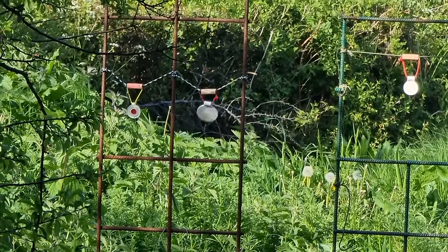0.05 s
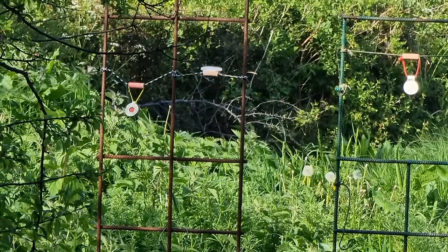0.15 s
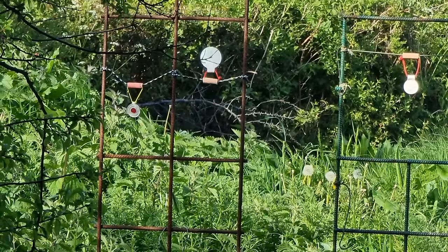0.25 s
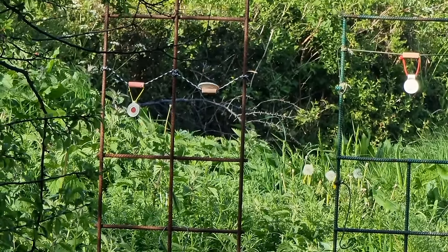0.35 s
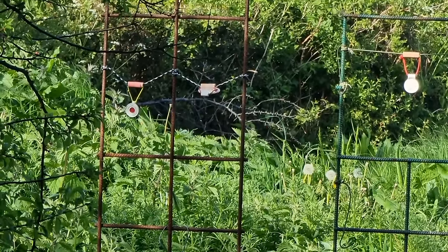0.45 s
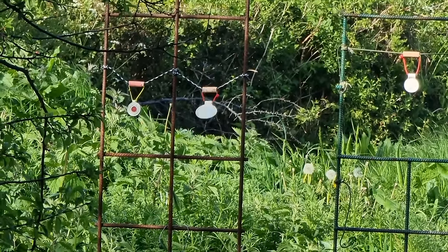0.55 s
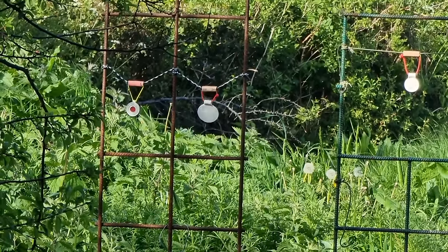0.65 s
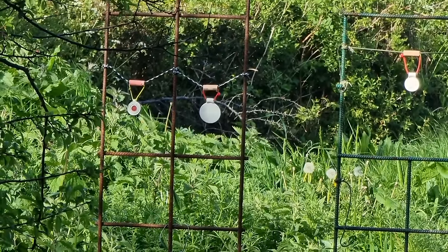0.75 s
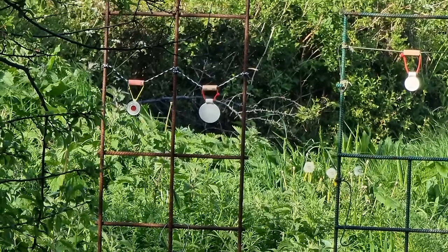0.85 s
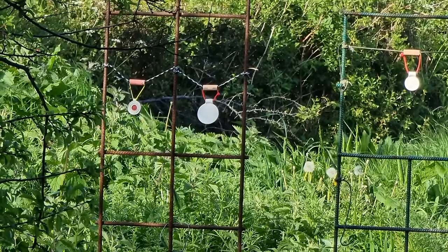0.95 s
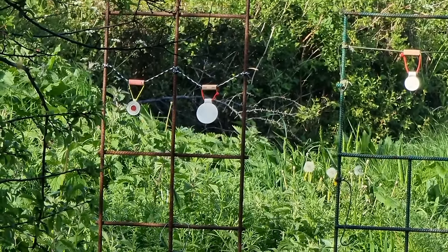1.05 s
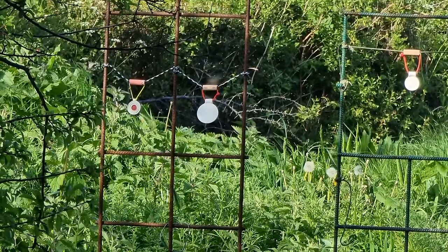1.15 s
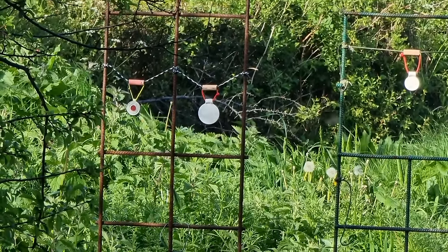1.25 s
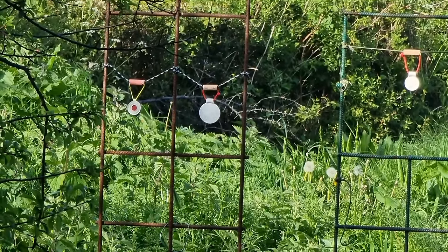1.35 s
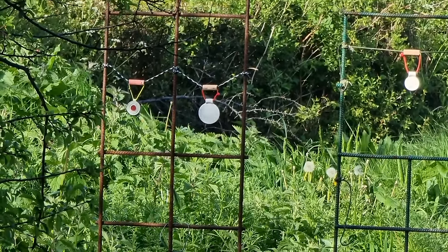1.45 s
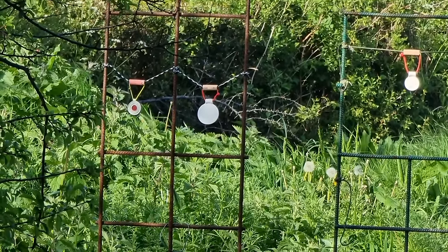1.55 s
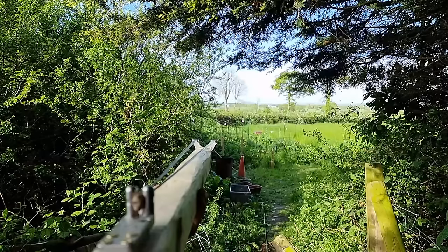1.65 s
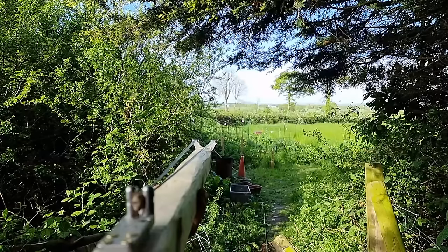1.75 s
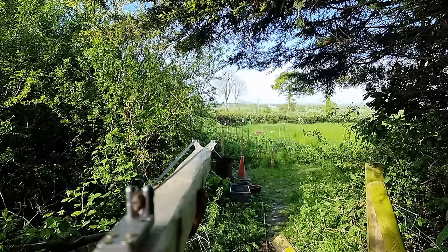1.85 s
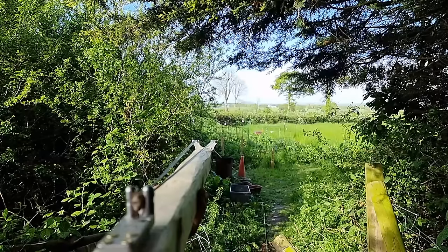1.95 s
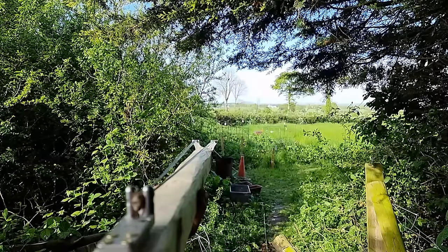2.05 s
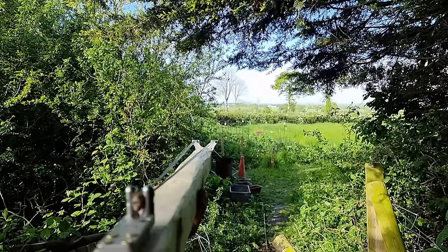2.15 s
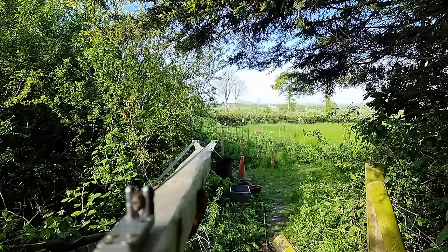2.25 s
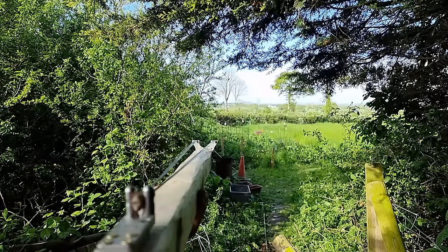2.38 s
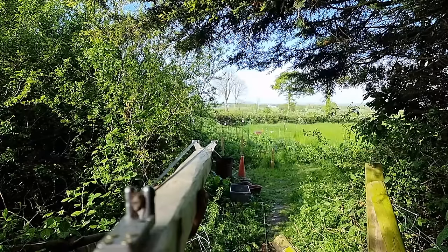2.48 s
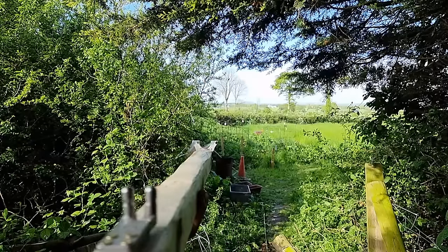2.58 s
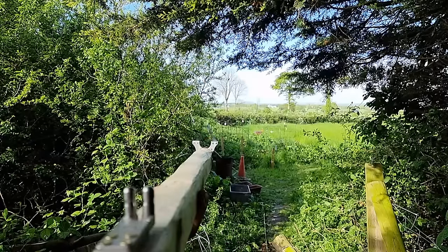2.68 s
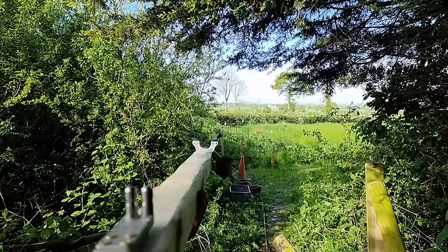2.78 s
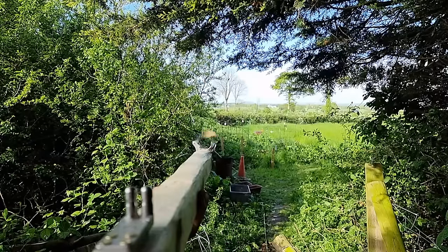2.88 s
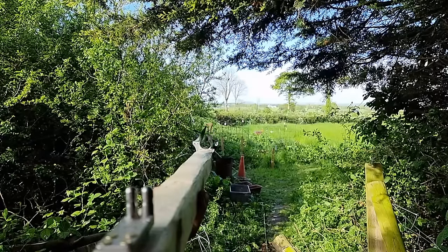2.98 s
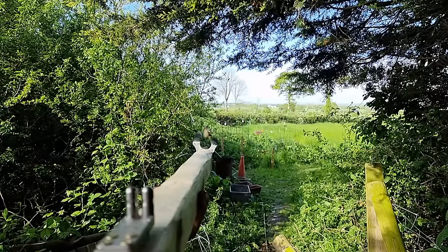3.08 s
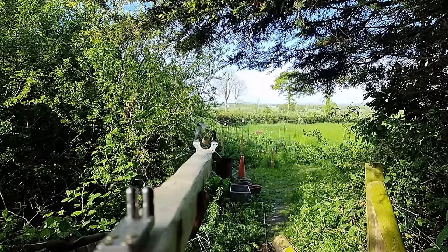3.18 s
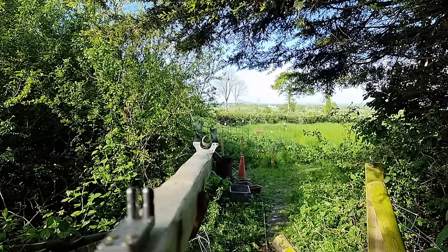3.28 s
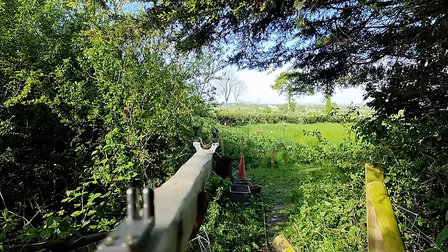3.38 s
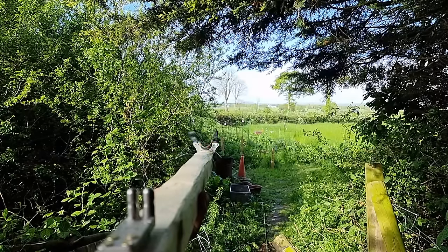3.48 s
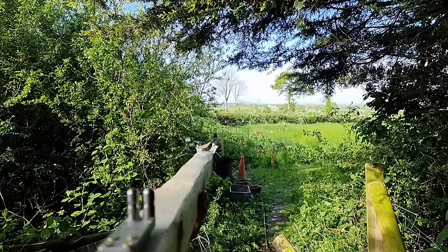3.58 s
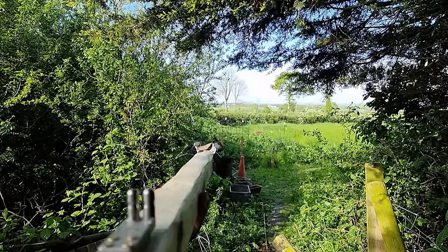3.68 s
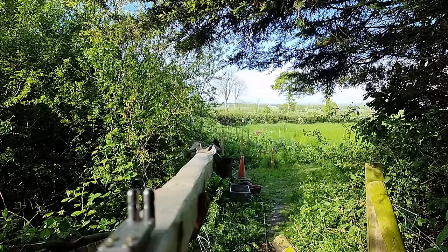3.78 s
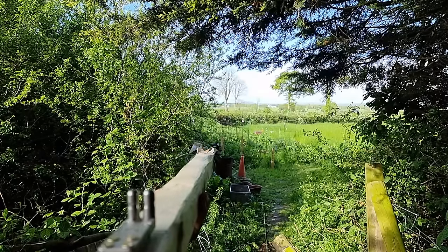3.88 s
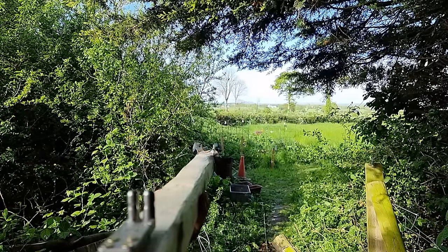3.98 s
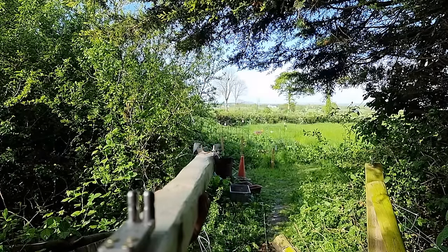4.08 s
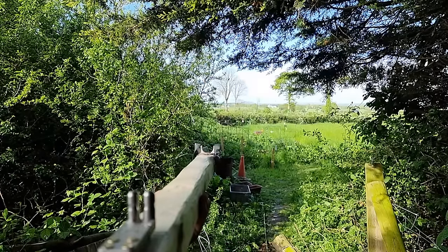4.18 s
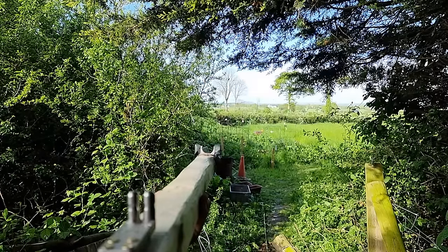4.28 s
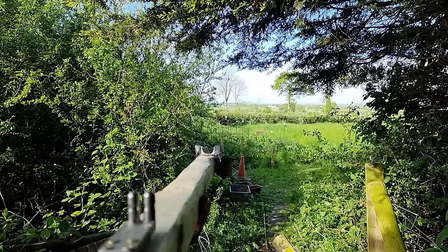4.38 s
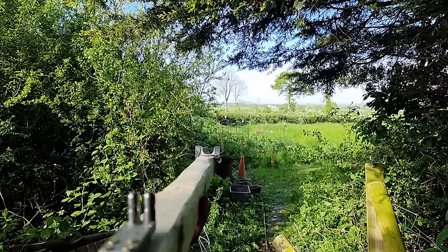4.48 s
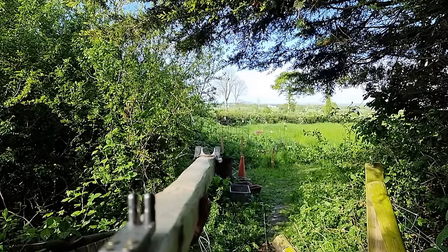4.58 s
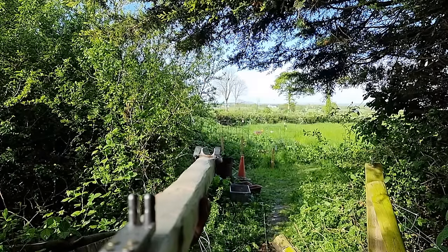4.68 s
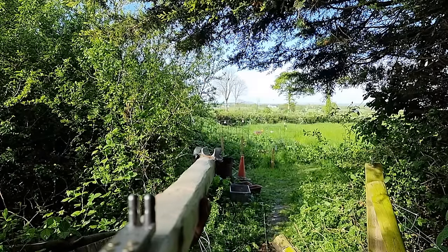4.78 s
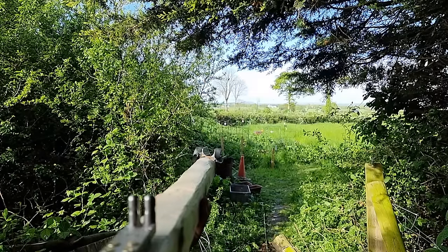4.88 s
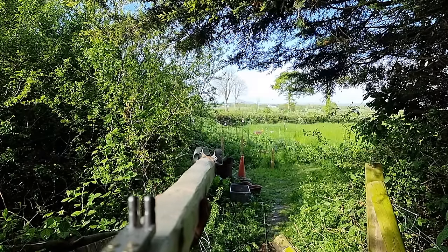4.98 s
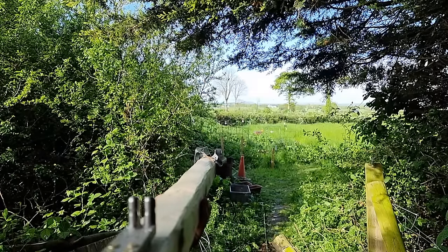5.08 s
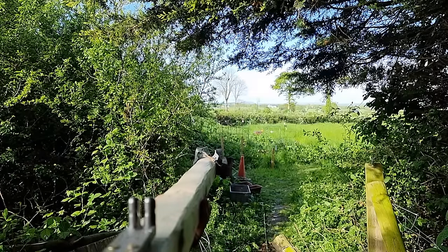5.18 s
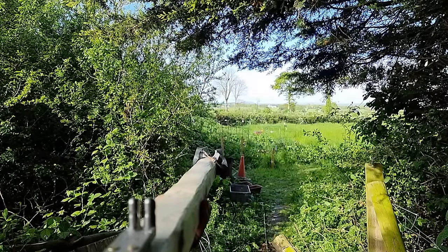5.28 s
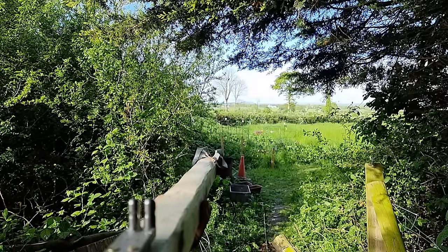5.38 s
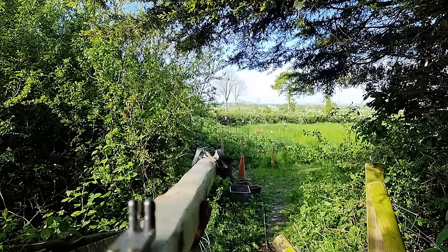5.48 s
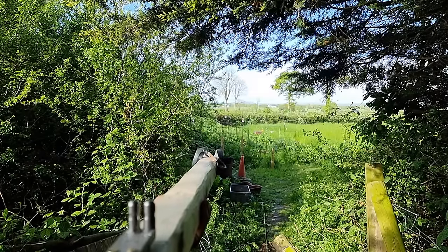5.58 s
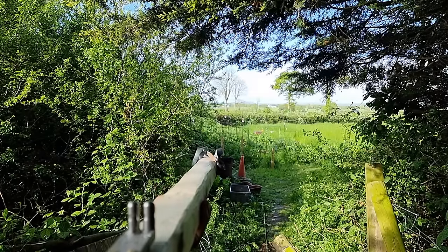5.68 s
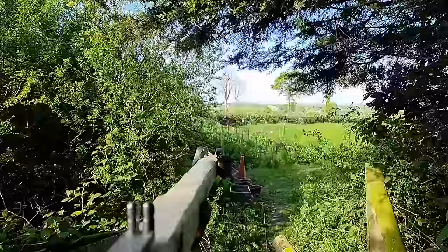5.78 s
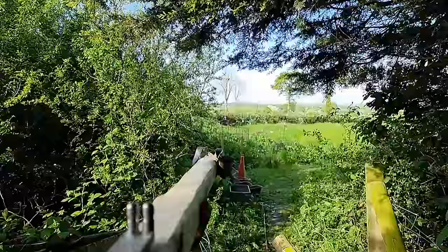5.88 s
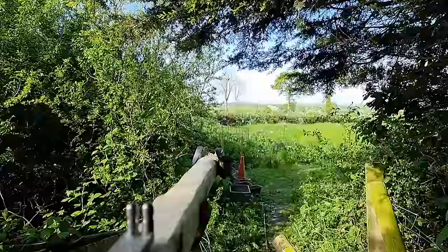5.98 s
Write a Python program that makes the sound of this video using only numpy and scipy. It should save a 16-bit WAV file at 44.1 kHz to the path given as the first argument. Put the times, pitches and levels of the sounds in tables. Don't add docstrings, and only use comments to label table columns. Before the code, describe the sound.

Outdoors in a garden, a hanging metal disc whirrs with falling pitch, clinking and squeaking quietly over gusty leaf hiss. After a tiny silence everything turns dark and slowed: a throbbing insect-like chirr, then a loud burst of wooden knocks, rattling bands and slaps with a rolling echo. A second later the ball thuds into a far target, ringing faintly, then soft bounces and low wind. Stereo microphone close to the slingshot.

```python
import sys
import numpy as np
from scipy import signal
from scipy.io import wavfile

SR = 44100
rng = np.random.default_rng(int(sys.argv[2]) if len(sys.argv) > 2 else 0)


def file_out(sig):
    cols = np.atleast_2d(sig).T
    lim = np.clip(cols, -1, 1)
    pcm = np.round(lim * 32767).astype(np.int16)
    wavfile.write(sys.argv[1], SR, pcm)


def to_linear_factor(level_db):
    exponent = np.asarray(level_db, float) / 20
    return 10 ** exponent


N = 266011
SPIN_END_S, SLOW_START_S = 1.662, 1.707
SLOW_TOP_HZ = 2760
EARS = np.array([[.5], [-.5]])


def rms_one(x):
    return x / np.sqrt(np.mean(x ** 2) + 1e-20)


def at_hz(points, hz):
    points = np.array(points)
    return np.interp(np.log(hz), np.log(points[:, 0]), points[:, 1])


def span(t0, t1):
    return np.arange(round(t0 * SR), min(round(t1 * SR), N)) / SR


def add(mix, x, t):
    start = round(t[0] * SR)
    mix[:, start:start + len(t)] += x


def white(t):
    return rng.standard_normal((2, 2, len(t)))


def grains(t, share, spread_db):
    shape = (2, 2, len(t))
    size_db = spread_db * np.minimum(rng.exponential(1, shape), 5)
    return rms_one(white(t) * to_linear_factor(size_db) * (rng.random(shape) < share))


def drift(rate_hz, size):
    points = rng.standard_normal(int(size / SR * 200) + 2000)
    knots = rms_one(np.convolve(points, np.hanning(int(200 / rate_hz) + 3), "same"))
    return np.interp(np.arange(size) * 200 / SR + 1000, np.arange(len(knots)), knots)


def swells(rows, t, calm_db):
    power = to_linear_factor(2 * calm_db) + 0 * t
    for s, db, rise, fall in rows:
        below_db = np.where(t < s, rise * (s - t), fall * (t - s))
        power = power + to_linear_factor(2 * (db - below_db))
    return 10 * np.log10(power)


def blend(hz, centres_hz, curves):
    place = np.interp(np.log(hz), np.log(centres_hz), np.arange(len(curves)))
    k = min(int(place), len(curves) - 2)
    return curves[k] * (1 - place + k) + curves[k + 1] * (place - k)


def bands(source, colour, alike, shape_db, patchy_db, top_hz, flicker_hz):
    out, size = 0, source.shape[-1]
    edges = 20 * 2 ** np.arange(0, np.log2(top_hz / 20) + .3, 1 / 3)
    centres = np.sqrt(edges[1:] * edges[:-1])
    total = np.sqrt(np.sum(to_linear_factor(at_hz(colour, centres)) ** 2 * np.diff(edges)))
    for k, (low, high, hz) in enumerate(zip(edges, edges[1:], centres)):
        sos = signal.butter(2, [low, min(high, .45 * SR)], "band", fs=SR, output="sos")
        mid, side = signal.sosfilt(sos, source[k % 2])
        c = np.clip(at_hz(alike, hz), -.99, .99)
        flutter_db = patchy_db * min(hz / 200, 1) * drift(flicker_hz, size)
        gain = to_linear_factor(at_hz(colour, hz) + shape_db(hz) + flutter_db)
        out = out + gain * (np.sqrt(1 + c) * mid + np.sqrt(1 - c) * side * [[1], [-1]])
    return out * np.sqrt(SR / 4) / total


def ring(clicks, hz, t60_s):
    r, w = to_linear_factor(-60 / (t60_s * SR)), 2 * np.pi * hz / SR
    return signal.lfilter([0, np.sin(w)], [1, -2 * r * np.cos(w), r * r], clicks + 1e-18)


def struck(t, events, modes, contact_s, spread_db, lag_s, tilt_db=lambda hz, row: 0):
    out, slips = np.zeros((2, len(t))), 6
    force = np.hanning(slips + 2)[1:-1] ** .25 * (-1) ** np.arange(slips)
    for row in events:
        at = round((row[0] - t[0]) * SR)
        chance = rng.normal(0, 1, (2, len(modes)))
        late, strength = rng.random((2, slips))
        late[0] = 0
        places = (np.arange(slips) + .5 * late) / slips * contact_s(row) * SR
        clicks = np.zeros((2, int(.3 * SR)))
        np.add.at(clicks[0], places.astype(int), -(.7 + .4 * strength) * force)
        clicks[1] = np.roll(clicks[0], int(abs(lag_s * row[2]) * SR))
        blow = 0
        for k, (hz, db, t60_s) in enumerate(modes):
            gain = to_linear_factor(db + tilt_db(hz, row) + spread_db * chance[:, [k]])
            blow = blow + gain * ring(clicks, hz, t60_s)
        blow = blow / np.abs(blow).max(axis=1, keepdims=True) * to_linear_factor(row[1] + EARS * row[2])
        blow = blow * np.linspace(1, 0, blow.shape[1])
        out[:, at:at + blow.shape[1]] += blow[:, :len(t) - at]
    return out


def pushed(t, rows):
    out, lag_s_per_db = np.zeros((2, len(t))), .00008
    for s, db, pan_db, hz, t60_s in rows:
        age = np.maximum(t - s + lag_s_per_db * (EARS * pan_db - abs(pan_db) / 2), 0)
        level = to_linear_factor(db + EARS * pan_db - 60 * age / t60_s)
        out -= (1 - np.exp(-age * hz / 0.35)) * level * np.sin(2 * np.pi * hz * age)
    return out


# (frequency [Hz], density [dB per Hz])
GARDEN_COLOUR = [(20, -18), (36, -22), (70, 4), (119, -9.5), (360, -17), (750, -20), (1300, -26.5),
                 (2000, -31.5), (3500, -32), (5900, -40), (8500, -46), (11500, -48), (13500, -43.5),
                 (15500, -48)]
# (frequency [Hz], left-right likeness [-1..1])
GARDEN_ALIKE = [(60, .9), (130, .83), (290, .52), (640, -.04), (1410, -.14), (3100, .13), (15000, .05)]
# (peak time [s], hiss level [dB], rise [dB/s], fall [dB/s])
GUSTS = [(.04, -57, 396, 182), (.39, -53, 73, 38), (.52, -55.5, 155, 35), (.74, -52, 300, 99),
         (1.0, -63, 24, 13), (1.125, -58.5, 400, 200), (1.22, -51, 500, 240)]
# (peak time [s], level [dB], rise [dB/s], fall [dB/s])
TWIG_SHIVERS = [
    (.31, -73.5, 139, 87),
    (1.46, -55, 902, 300),
]
# (peak time [s], level [dB], rise [dB/s], fall [dB/s])
BRANCH_SWAY = [(1.585, -54.5, 148, 159)]
CALM_HISS_DB, RUMBLE_DB, AIR_DB = -98, -63, -59
RUSTLE_DB, RUSTLE_FOLLOWS = -77.5, 0.18
FADE_S, FADE_DB = 0.045, -7.5
LULL_S, LULL_DB = 0.47, -8


def garden(t):
    hiss = swells(GUSTS, t, CALM_HISS_DB)
    rustle = swells(TWIG_SHIVERS, t, RUSTLE_DB + RUSTLE_FOLLOWS * (hiss + 70))
    air = swells(BRANCH_SWAY, t, AIR_DB)
    lull = LULL_DB * np.clip((t - LULL_S) / 0.11, 0, 1)
    upper_hiss = 0.41 * rustle + 0.51 * hiss + 69 + lull
    fade = FADE_DB * np.clip(1 - (SPIN_END_S - t) / FADE_S, 0, 1)
    curves = [RUMBLE_DB + 57.0, air + 60.5, rustle + 70, upper_hiss, hiss + 68]
    shape = lambda hz: fade + blend(hz, [150, 800, 4000, 8500, 12000], curves)
    source = 1.16 * white(t) + .3 * grains(t, 0.02, spread_db=2.5)
    bed = to_linear_factor(-47.5) * bands(source, GARDEN_COLOUR, GARDEN_ALIKE, shape, 1.5, 15500, flicker_hz=50.0)
    return signal.sosfilt(signal.ellip(10, .5, 60, 15480, fs=SR, output="sos"), bed)


# (time [s], peak [dB], left-right [dB])
CLINKS = [(0.024, -58, 0), (0.0405, -62, -4), (0.27, -66, 3), (0.31, -63, 1), (0.508, -55, 1),
          (1.175, -49, 2), (1.216, -56, -4), (1.478, -47, 2), (1.6, -56, 2), (1.452, -28, 0)]
# (frequency [Hz], level [dB], t60 [s])
DISC = [(1330, 23.5, 0.018), (1600, 8, 0.033), (2400, 12, 0.031), (2820, 9.5, 0.033), (3200, 1.5, 0.038),
        (3600, -19, 0.042), (4700, 1, 0.029), (6060, -20, 0.0049), (7360, -26, 0.013), (10900, -12, 0.0069)]


def disc_clinks(t):
    tilt = lambda hz, row: -.35 * (row[1] + 60) if hz > 6500 else 0
    return struck(t, CLINKS, DISC, lambda row: .0008, spread_db=2.0, lag_s=.00002, tilt_db=tilt)


# (time [s], peak [dB], left-right [dB])
SQUEAKS = [(.2, -72, -4.5), (.37, -62, -4), (.41, -66, -5.5), (.515, -64, -6), (.745, -67.5, -2.5),
           (.83, -60, -4.5)]
# (frequency [Hz], level [dB], t60 [s])
PIVOT = [(10780, 0, .08), (11550, -4, .05)]


def pivot_squeaks(t):
    return struck(t, SQUEAKS, PIVOT, lambda row: .012, spread_db=3.0, lag_s=.00002)


def disc_swish(t):
    hz, width_hz = 3520, 600
    level_db = swells([(.32, -58.5, 150, 200)], t, -120)
    noise = ring(white(t)[0], hz, 1.7 / width_hz)
    return to_linear_factor(level_db) * rms_one(ring(noise, hz, 2.2 / width_hz))


WHIRR_S, WHIRR_DB, WHIRR_RISE_DB_PER_S, WHIRR_FALL_DB_PER_S = .478, -42.5, 340, 114
SPIN_HZ, REST_HZ = 381, 243
COAST_HZ_PER_S, SAG_HZ_PER_S = 190, 930


def disc_hum(t):
    fall = np.where(t < WHIRR_S, COAST_HZ_PER_S, SAG_HZ_PER_S)
    hz = np.maximum(SPIN_HZ - fall * (t - WHIRR_S), REST_HZ)
    db = swells([(WHIRR_S, WHIRR_DB, WHIRR_RISE_DB_PER_S, WHIRR_FALL_DB_PER_S)], t, -120)
    level = np.sqrt(2) * to_linear_factor(db + 2.9 * drift(46, len(t)))
    return level * np.sin(2 * np.pi * np.cumsum(hz) / SR) * to_linear_factor([[-1.5], [1.5]])


# (time [s], peak [dB], left-right [dB])
LINK_TOUCHES = [(1.175, -58, 0), (1.383, -54, 2), (1.405, -54, 2), (1.48, -59, 0), (1.505, -60, 0),
                (1.555, -62, 0)]
# (frequency [Hz], level [dB], t60 [s])
LINK = [(2820, 32, 0.25), (2690, 20, 0.14), (2070, 21, 0.17), (3540, -18, 0.051)]


def link_rings(t):
    return struck(t, LINK_TOUCHES, LINK, lambda row: .006, spread_db=3.0, lag_s=.00002)


# (frequency [Hz], density [dB per Hz])
TAUT_COLOUR = [(12, -28), (20, -0.5), (43, -16.5), (113, -17.5), (197, -23), (274, -24), (414, -22.5),
               (520, -24.5), (588, -52), (1140, -60.5), (1240, -32.5), (1720, -60.5), (2760, -44.5),
               (3590, -65), (6070, -120)]
# (frequency [Hz], density [dB per Hz])
GUST_COLOUR = [(12, -29), (20, -3), (30, -1), (43, -18.5), (118, -19), (219, -28.5), (359, -28.5),
               (389, -38), (553, -16.5), (738, -8.5), (1190, -31), (1750, -41), (2760, -53.5),
               (3590, -73.5), (6070, -120)]
# (frequency [Hz], left-right likeness [-1..1])
SLOW_ALIKE = [(30, .8), (60, .55), (130, 0), (300, -.1), (2700, .045)]
# (time [s], level [dB])
BREEZE = [(1.7, -40), (1.9, 4), (2.4, 5), (3.6, 6.5), (4.4, 1), (5.1, -5.5), (5.35, 6), (5.6, 9), (6.03, 7)]
# (peak time [s], level [dB], rise [dB/s], fall [dB/s])
JOLTS = [
    (2.6, -34, 113.5, 69),
    (3.85, -45, 115.5, 38),
    (4.85, -52, 27.5, 13.5),
]
# (peak time [s], level [dB], rise [dB/s], fall [dB/s])
STIRS = [
    (3.0, -44.5, 54, 21),
    (4.4, -40.5, 25.5, 33),
]
LEAF_DB, LEAF_FOLLOWS = -61, 0.43
WIND_DB, WIND_FOLLOWS, WIND_GROWS_DB_PER_S = -55.5, 0.23, -1.8


def slow_air(t):
    breeze = np.interp(t, *np.transpose(BREEZE))
    wind = swells(JOLTS, t, WIND_DB + WIND_FOLLOWS * breeze + WIND_GROWS_DB_PER_S * (t - t[0]))
    leaves = swells(STIRS, t, LEAF_DB + LEAF_FOLLOWS * breeze)
    share = np.clip((t - 2.5) / 4.11, 0, 1)
    turn = lambda hz: share * (at_hz(GUST_COLOUR, hz) - at_hz(TAUT_COLOUR, hz) - 3.0)
    shape = lambda hz: turn(hz) + blend(hz, [60, 500, 1800], [wind + 52, leaves + 55, breeze])
    return to_linear_factor(-46) * bands(white(t), TAUT_COLOUR, SLOW_ALIKE, shape, 1.0, SLOW_TOP_HZ, flicker_hz=15.0)


# (frequency [Hz], width [Hz], level [dB])
INSECT = [(521, 6.5, 0), (273.3, 6.3, -4), (800, 1400, -12), (1125, 53, -21), (1450, 20, -17.5),
          (1714, 170, -13.5), (2515, 35, -21.5)]
THROB_S, THROB_HZ, THROB_DEPTH_DB, THROB_EVENS_S = 1.893, 11.1, 8, 0.33
CHIRR_DB, CHIRR_SWELL_S, CHIRR_STOP_S, CHIRR_FALL_DB_PER_S = -56, 0.065, 2.36, 290
CHORUS_S, CHORUS_SPAN_S, CHORUS_DIP_DB = 2, 0.34, 8


def insect(t):
    age = t - t[0]
    evening = np.exp(-(age / THROB_EVENS_S) ** 2)
    throb = THROB_DEPTH_DB * evening * np.cos(2 * np.pi * THROB_HZ * (t - THROB_S))
    stop = CHIRR_FALL_DB_PER_S * np.maximum(t - CHIRR_STOP_S, 0)
    singer_db = CHIRR_DB - 20 * np.exp(-age / CHIRR_SWELL_S) - stop + throb
    dip = CHORUS_DIP_DB * ((t - CHORUS_S) / CHORUS_SPAN_S) ** 2
    noise, out = rng.standard_normal((2, len(t))), 0
    for k, (hz, width_hz, db) in enumerate(INSECT):
        line = rms_one(ring(ring(noise, hz, 1.9 / width_hz), hz, 2.8 / width_hz))
        level_db = db - 53.0 - dip * (hz > 1000)
        if k == 0:
            line = rms_one(line / np.abs(signal.hilbert(line)) ** .7)
            level_db = singer_db + 1.5
        out = out + line * to_linear_factor(level_db)
    return out


# (time [s], peak [dB], left-right [dB], brightness [dB], contact [s])
KNOCKS = [(2.205, -52, 3, -30, .009), (2.235, -54, 3, -25, .02), (2.4358, -19, 6, -6, .008),
          (2.486, -17, -4, -12, .003), (2.492, -18, -5, -14, .003), (2.5, -23, 0, -8, .006),
          (2.5405, -5, 6, -2, .006), (2.546, -10, 4, -6, .005), (2.568, -6, 1, -4, .003),
          (2.574, -12, 4, -4, .003), (2.612, -14, -2, -3, .008), (2.664, -12, 3, 0, .012),
          (2.677, -7, 3, -8, .009), (2.692, -10, 4, -6, .008), (2.618, -13, 0, -8, .006),
          (2.7, -18, 2, -16, .003), (2.84, -20, 2, -10, .003), (2.8, -14, 2, 2, .005)]
# (frequency [Hz], level [dB], t60 [s])
STOCK = [(113.1, -23, 0.043), (171.3, -2, 0.14), (252, 3, 0.065), (400, -12.5, 0.014), (550.7, -6, 0.36),
         (810, -10.5, 0.035), (853, 8.5, 0.027), (1370, -11, 0.0094), (1560, 8.5, 0.0044),
         (1730, 12, 0.011), (2260, -7, 0.0061), (2500, 6.5, 0.014), (2200, -4.5, 0.016)]
THUMP_DB, THUMP_PER_DULL = -13, 0.22
SHADE_PER_PAN = 2.9


def stock_knocks(t):
    def tilt(hz, row):
        if hz > 1200:
            return row[3] - np.array([[0], [SHADE_PER_PAN * row[2] * (hz > 2000)]])
        return THUMP_DB - THUMP_PER_DULL * row[3] if hz < 300 else 0
    return struck(t, KNOCKS, STOCK, lambda row: row[4], spread_db=2.0, lag_s=.0001, tilt_db=tilt)


# (time [s], peak [dB], left-right [dB], frequency [Hz], t60 [s])
THUDS = [(2.207, -37, 7, 334, 0.09), (2.237, -35, -4, 201, 0.097), (2.549, -8.5, 8, 161, 0.092),
         (2.478, -10, -12.5, 483, 0.044), (2.491, -16, -6, 479.7, 0.047), (2.542, -4.5, 6.5, 830, .045),
         (2.548, -13.5, -7, 430, 0.031), (2.553, -15.5, -6.5, 290, 0.036), (2.62, -22.5, -10.5, 450, 0.053),
         (2.668, -19.5, -8.5, 520, 0.069), (2.733, -21.5, -4.5, 330, 0.027), (2.735, -10.5, 13, 950, 0.015),
         (3.684, -9.5, -17, 490, 0.028), (4.31, -36.5, -1, 760, 0.047), (2.43, -23, 8, 306, 0.052),
         (2.676, -15, 1, 594, 0.14), (3.719, -14, -4.5, 806, 0.0081), (3.731, -37, -4, 54.1, 0.94),
         (4.269, -42.5, 1, 55.6, 0.74), (4.291, -29.5, 10, 400, 0.1), (4.311, -40.5, 5, 163, 0.17),
         (4.599, -40, 2, 202, 0.045)]


def thuds(t):
    return pushed(t, THUDS)


# (time [s], level [dB], brightness [dB], treble left-right [dB])
RATTLE = [(2.427, -38.5, -21, 9.5), (2.436, -20, -15, 10.5), (2.481, -21.5, -4.5, 9.5),
          (2.498, -27, -11.5, 8.5), (2.54, -14, -1.5, 9.5), (2.562, -16.5, -4.5, 4),
          (2.606, -22.5, 4, -1.5), (2.644, -20, 1, 2.5), (2.664, -17, -4, 0), (2.683, -18.5, -17, 4.5),
          (2.709, -25, -26.5, 4.5), (2.776, -28, -1.5, -4), (2.806, -23, 1, -6.5)]
# (frequency [Hz], density [dB per Hz])
RATTLE_COLOUR = [(24, -33), (40, -33), (74, 4), (102, -1.5), (201, 5), (291, 1.5), (366, 2.5), (422, -2.5),
                 (570, -0.5), (669, -31.5), (744, 7.5), (1160, -19), (1840, -10.5), (2010, -32.5),
                 (2760, -4.5), (3590, -41.5), (6070, -120)]
RATTLE_T60_S, RATTLE_PAN_DB = 0.35, 0.63


def band_rattle(t):
    low, high = np.full((2, 2, len(t)), 1e-12)
    for s, low_db, bright_db, pan_db in RATTLE:
        age = np.maximum(t - s, 0)
        fade = (to_linear_factor(-60 * age / RATTLE_T60_S) * (1 - np.exp(-age / 0.00033))) ** 2
        low = low + to_linear_factor(2 * low_db) * fade
        high = high + to_linear_factor(2 * (low_db + bright_db) + np.array([[1], [-1]]) * pan_db) * fade
    curves = [10 * np.log10(low) + 22, 10 * np.log10(high) + 28]
    shape = lambda hz: blend(hz, [900, 1400], curves)
    source = grains(t, 0.11, spread_db=1.5)
    rattle = bands(source, RATTLE_COLOUR, SLOW_ALIKE, shape, 2.0, SLOW_TOP_HZ, flicker_hz=49.0)
    return to_linear_factor(-22.5) * rattle * to_linear_factor(EARS * RATTLE_PAN_DB)


# (time [s], left peak [dB], right peak [dB], dulled above [Hz])
OVERLOADS = [(2.5432, -19.5, -83, 4200), (3.6828, -51.5, -38, 4300), (2.479, -69, -63, 4200),
             (2.738, -61.5, -61, 4000), (2.468, -80.5, -81, 9000), (2.4945, -78.5, -77.5, 11000),
             (2.497, -67, -71.5, 13000), (2.5415, -71, -71, 15000), (2.551, -70.5, -71, 13000),
             (2.719, -79, -79.5, 12000), (2.732, -75, -76, 13000)]
FIZZ_S, FIZZ_END_S, FIZZ_DB, FIZZ_HZ = 2.546, 2.572, -53.5, (3250, 4230)


def overload(t):
    out = np.zeros((2, len(t)))
    above_slow = signal.butter(4, 2900, "high", fs=SR, output="sos")
    for s, left_db, right_db, dull_hz in OVERLOADS:
        click = (np.arange(len(t)) == round((s - t[0]) * SR)) + 1e-18
        tick = signal.sosfilt(signal.butter(7, dull_hz, fs=SR, output="sos"), click)
        tick = signal.sosfilt(above_slow, tick)
        out += tick / np.abs(tick).max() * to_linear_factor([[left_db], [right_db]])
    fizz_band = signal.butter(4, FIZZ_HZ, "band", fs=SR, output="sos")
    fizz = rms_one(signal.sosfilt(fizz_band, rng.standard_normal(len(t))))
    out[0] += to_linear_factor(FIZZ_DB) * fizz * np.clip(np.minimum(t - FIZZ_S, FIZZ_END_S - t) / .003, 0, 1)
    return out


# (time [s], peak [dB], left-right [dB], right-ear loss above 2 kHz [dB], contact [s])
SLAPS = [
    (2.4775, -2.5, 2.5, 18, .0035),
    (2.5625, -3, 2, 0, .0019),
    (2.7354, -5, 3, 6, .0016),
    (2.7378, -5, 9, 6, .002),
]
# (frequency [Hz], level [dB], t60 [s])
POUCH = [(200, -10, .02), (520, -6, .022), (950, -5, .01), (1600, 5, .009), (2100, 3, .009),
         (2500, 6, .008), (2800, 3, .007)]


def pouch_slaps(t):
    tilt = lambda hz, row: np.array([[2], [2 - row[3] * (hz > 2000)]]) * (hz > 1200)
    return struck(t, SLAPS, POUCH, lambda row: row[4], spread_db=1.5, lag_s=.000315, tilt_db=tilt)


# (time [s], peak [dB], left-right [dB])
TWANGS = [(2.503, -24.5, 13.5), (2.512, -26, 15), (2.523, -26.5, 13.5), (2.53, -29, 13.5),
          (2.663, -16.5, 12), (2.682, -20, 12)]
# (frequency [Hz], level [dB], t60 [s])
HOOK = [(1860, 0.5, 0.06), (1740, -8, 0.05)]


def hook_twangs(t):
    return struck(t, TWANGS, HOOK, lambda row: .003, spread_db=6.0, lag_s=.0001)


def hedge_echo(t, colour, t60, db, rise_s):
    age = t - t[0]
    fall = lambda hz: -60 * age / at_hz(t60, hz)
    echo = bands(white(t), colour, SLOW_ALIKE, fall, 2.0, SLOW_TOP_HZ, flicker_hz=46.0)
    return to_linear_factor(db) * (1 - np.exp(-age / rise_s)) * echo


# (frequency [Hz], density [dB per Hz])
SHOT_ECHO = [(24, -12.5), (40, -12), (69, -3.5), (133, -18), (201, -2), (393, -15), (495, 1.5), (718, -4),
             (904, -0.5), (1160, -9.5), (1680, 2.5), (2400, -0.5), (2760, -3.5), (3590, -45), (6070, -120)]
# (frequency [Hz], t60 [s])
SHOT_T60 = [(60, 1.2), (170, 3.5), (300, 1.4), (700, 1.75), (1400, 1.35), (2000, 1.036), (2700, 1.06)]


def shot_echo(t):
    return hedge_echo(t, SHOT_ECHO, SHOT_T60, db=-21.0, rise_s=0.022)


# (time [s], peak [dB], left-right [dB], brightness [dB], contact [s])
STRIKES = [(3.693, -14, 2, -10, .006), (3.7195, -18, -11, -14, .003), (4.115, -42, 0, -20, .01),
           (4.151, -40, -2, -20, .01), (4.6, -44, 0, -20, .006), (4.905, -58, 2, -25, .004),
           (4.292, -35, 3, -26, .012), (4.308, -35, -2, -16, .005), (4.6105, -41.5, 0, -21, .0036),
           (3.6798, -11, 0, 0, .0032)]
# (frequency [Hz], level [dB], t60 [s])
TARGET = [(150, -13, 0.1), (244, 4, 0.024), (410, 11.5, 0.026), (540, 3, 0.023), (740, -4.5, 0.025),
          (889, -1.5, 0.021), (1010, -12.5, 0.0046), (1800, 5, 0.013), (2240, 4, 0.021), (2700, 2.5, 0.01)]
# (frequency [Hz], level [dB], t60 [s])
TARGET_RING = [(192.6, 0, 1.3), (437.7, 1.5, 2.75), (548, 0, 0.89), (760, -7.5, 0.44), (945, 4, 0.93)]


def target(t):
    tilt = lambda hz, row: row[3] if hz > 1200 else 0
    blows = struck(t, STRIKES, TARGET, lambda row: row[4], spread_db=2.0, lag_s=.00005, tilt_db=tilt)
    age = np.maximum(t - STRIKES[-1][0], 0)
    swing = lambda: np.array([drift(22, len(t)), drift(22, len(t))])
    after = 0
    for hz, db, t60_s in TARGET_RING:
        level = to_linear_factor(db - 60 * age / t60_s) * (1.0 + .3 * swing())
        after = after + level * np.sin(2 * np.pi * hz * age + .8 * swing())
    return blows + to_linear_factor(-38.5) * after * (1 - np.exp(-age / 0.041))


# (time [s], peak [dB], left-right [dB], frequency [Hz], t60 [s])
IMPACT = [(3.6798, -5, 0, 930, .026), (3.6794, -8, -3, 390, .035), (3.6794, -11, -2, 230, .035),
          (3.6796, -12, 2, 155, .06), (3.6798, -11, 1, 680, .018), (3.6802, -17, 3, 1700, .016)]


def target_dent(t):
    return pushed(t, IMPACT)


# (frequency [Hz], density [dB per Hz])
STRIKE_ECHO = [(24, -50), (40, -18.5), (60, 5.5), (81, -32.5), (194, 1.5), (301, -9.5), (437, 3),
               (634, -26), (705, -7), (937, -10), (1120, -23.5), (2400, -19.5), (2760, -63.5), (3590, -73),
               (6070, -120)]
# (frequency [Hz], t60 [s])
STRIKE_T60 = [(60, 0.39), (200, 0.66), (450, 1.15), (900, 1.6), (1500, 1.49), (2700, 0.68)]


def strike_echo(t):
    return hedge_echo(t, STRIKE_ECHO, STRIKE_T60, db=-22.0, rise_s=0.0022)


def slowed():
    mix = np.zeros((2, N))
    parts = [(SLOW_START_S, 7, slow_air), (SLOW_START_S, 2.44, insect), (2.1, 3.2, stock_knocks),
             (2.1, 5.6, thuds), (2.1, 3.2, band_rattle), (2.1, 3.2, pouch_slaps), (2.1, 3.2, hook_twangs),
             (2.735, 4.4, shot_echo), (3.6, 5.6, target), (3.6, 5.6, target_dent), (3.684, 5.6, strike_echo)]
    for t0, t1, source in parts:
        t = span(t0, t1)
        add(mix, source(t), t)
    return mix


def scene():
    mix = np.zeros((2, N))
    t = span(0, SPIN_END_S)
    disc = disc_clinks(t) + pivot_squeaks(t) + disc_swish(t) + disc_hum(t) + link_rings(t)
    add(mix, garden(t) + disc, t)
    t = span(SLOW_START_S, 7)
    shot, knee = slowed()[:, -len(t):], 8
    shot = shot / (1 + np.abs(shot / 1.02) ** knee) ** (1 / knee)
    top_cut = signal.cheby2(14, 75, SLOW_TOP_HZ * 1.161, fs=SR, output="sos")
    add(mix, signal.sosfilt(top_cut, shot), t)
    t = span(2.4, 3.8)
    add(mix, overload(t), t)
    return mix


def low_pass(x):
    return signal.sosfilt(signal.butter(12, 16670, fs=SR, output="sos"), x)


def record(dry):
    hiss = to_linear_factor(-92.5) * rng.standard_normal(dry.shape)
    live = (np.arange(N) < SPIN_END_S * SR) | (np.arange(N) > SLOW_START_S * SR)
    return low_pass(dry + hiss * live)


dry = scene()
out = record(dry)
file_out(out)
```